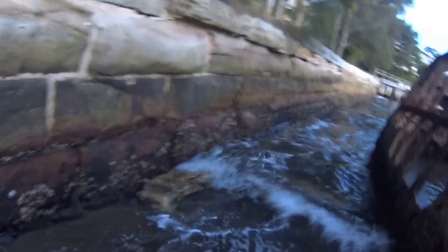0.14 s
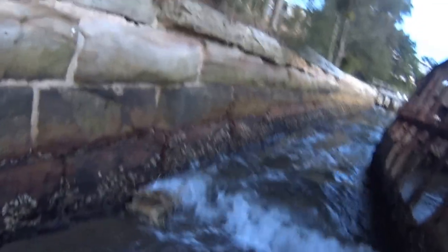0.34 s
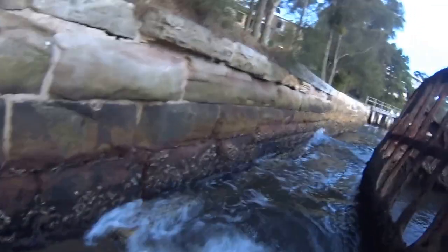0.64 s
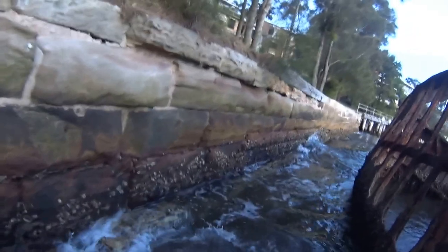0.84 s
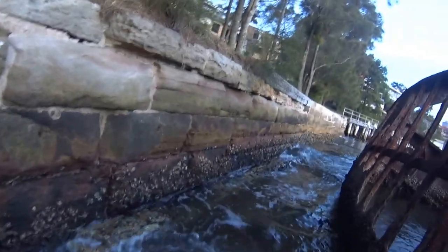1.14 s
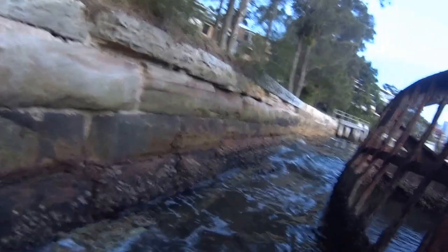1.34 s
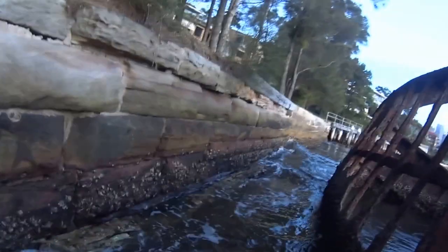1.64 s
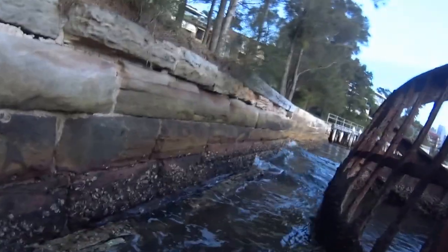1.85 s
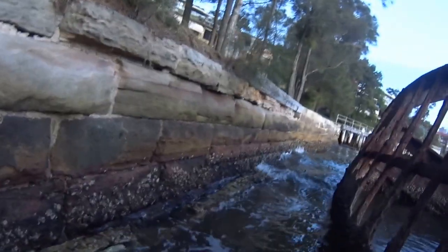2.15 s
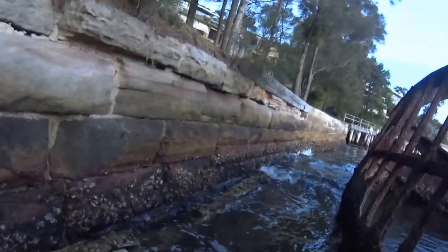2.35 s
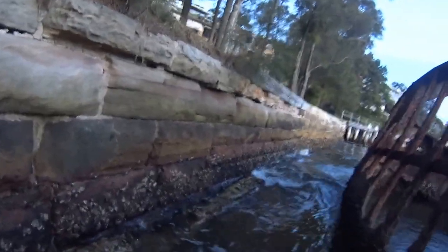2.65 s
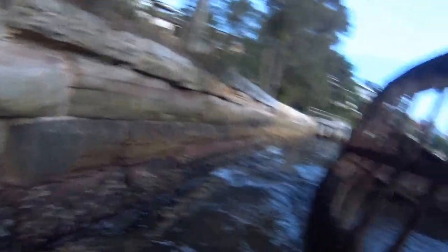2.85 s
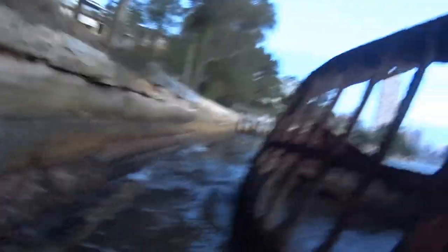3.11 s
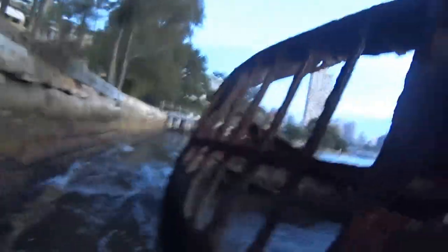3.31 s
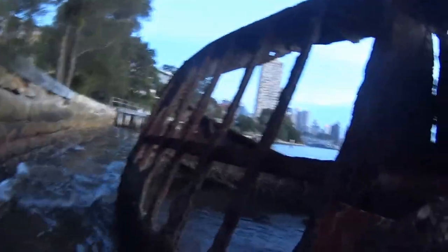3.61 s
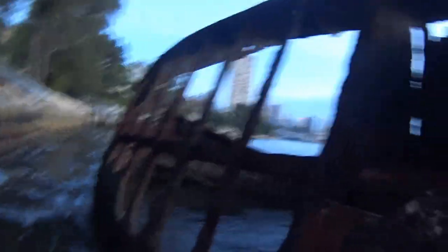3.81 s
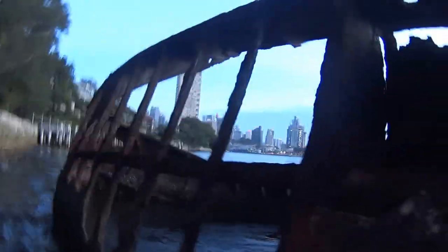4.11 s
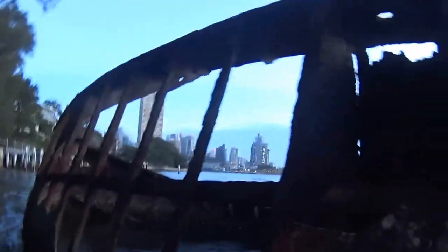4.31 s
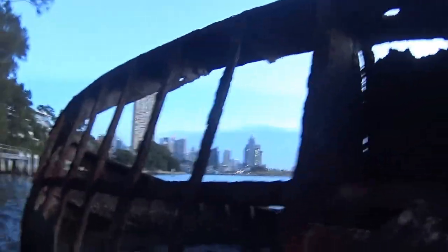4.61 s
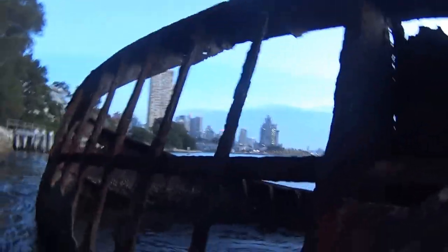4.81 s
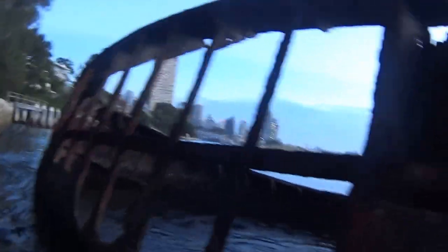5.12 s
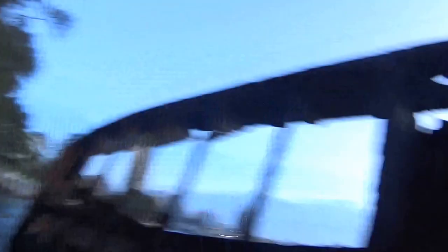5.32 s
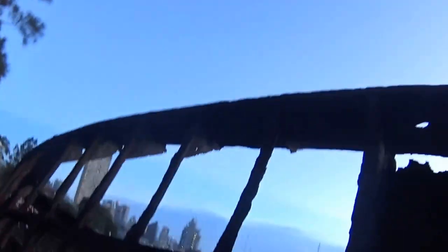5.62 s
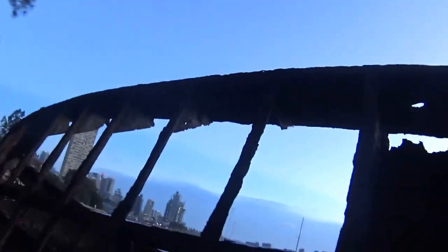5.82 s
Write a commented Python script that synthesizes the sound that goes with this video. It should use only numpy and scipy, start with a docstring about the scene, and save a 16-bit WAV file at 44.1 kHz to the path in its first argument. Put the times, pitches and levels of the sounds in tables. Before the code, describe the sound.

Shallow harbour water sloshes against a stone wall, heard close through a handheld stereo microphone. The first wave foams and drains away to soft lapping, with a couple of sharp taps. Then the grip shifts: a flurry of clicky knocks, creaky rubbing and a short squeak. Low wind buffets and dull finger judders follow while a second wave washes in.

```python
"""A harbour seawall beside a rusted hull, heard close through a handheld camera's stereo microphone.
Small waves wash along the stone: foam fizzes, bubbles and drops ring. One wave breaks at the start,
another near the end, as the microphone turns towards the hull. From about two seconds in the hand shifts
its grip: fingers knock, rub, squeak and judder on the case, which rings near 1.5 kHz, and moving air
rumbles on the two microphone ports."""
import sys
import numpy as np
from scipy import signal
from scipy.fft import rfft, irfft, next_fast_len
from scipy.io import wavfile
from scipy.ndimage import uniform_filter1d

SR = 44100
rng = np.random.default_rng(int(sys.argv[2]) if len(sys.argv) > 2 else 0)


def store_pcm(level_fs):
    """Save levels as 16-bit WAV."""
    pcm = np.round(np.clip(level_fs, -1, 1) * 32767).astype(np.int16)
    wavfile.write(sys.argv[1], SR, np.atleast_2d(pcm).T)


N = 262836
TIME = np.arange(N) / SR

# waves along the wall: crest t/s, level/dB, build t/s
WAVES = [(0.48, -34, 0.7), (2.4, -52.5, 0.66), (4.2, -50.5, 1.37), (5.7, -37.5, 0.58)]
# small splashes: t/s, lift of the wash/dB, half-width t/s
SPLASHES = [(1.007, 2.5, 0.037), (1.796, 5, 0.012), (2.238, 4, 0.031), (2.44, 2.5, .03), (2.635, 2, 0.037),
            (5.111, 9, 0.021)]
# water spectrum, microphone facing the wall or the hull: f/Hz, level/dB
WALL_SPECTRUM = [(100, -20), (200, -13), (400, -10.5), (650, -16.5), (980, -16), (1220, -6.5), (1500, -4),
                 (1800, -8), (2450, -16), (3050, -13), (4000, -11.5), (6100, -7), (7300, -15), (11000, -25)]
HULL_SPECTRUM = [(150, -13), (400, -8), (700, -10.5), (980, -10.5), (1200, 0), (1500, -7), (1900, -5.5),
                 (2250, -15), (3100, -10.5), (4300, -12.5), (6200, -11), (7500, -21), (11000, -32.5)]
# leftward lean of those two views, applied in part to each side: f/Hz, lean/dB
WALL_LEAN = [(600, 0), (1200, 1), (1500, -6.5), (2000, 4), (5000, -2.5), (10000, -1)]
HULL_LEAN = [(300, -2), (700, 3), (1250, 10), (1550, -4.5), (2200, 2.5), (6000, 2.5)]
# stereo width at the ports: f/Hz, side minus mid/dB
PORT_WIDTH = [(100, -13), (350, -14), (650, -2), (950, -8.5), (1300, -6), (2000, -2.5), (2500, 6.5),
              (3600, -3), (6500, -7.5), (11000, -3.5)]
# resonance of the hollow behind the ports: f/Hz, bandwidth/Hz, gain/dB
PORT_HOLLOW = (1510, 45, -0.43)
# close drops and bubbles: t/s, peak/dB, starting f/Hz
DROPS = [(0.272, -27.5, 1560), (0.439, -26, 1474), (0.714, -24.5, 1503), (1.022, -24, 5700),
         (2.328, -32, 1490), (2.499, -32, 5630), (3.438, -28.5, 4370)]
# finger knocks: t/s, ring peak/dB, thud relative to ring/dB, contact t/s
KNOCKS = [(0.0543, -9.5, -24, 0.002), (1.9183, -5.5, -23, 0.001), (2.759, -30.5, -4.5, 0.0021),
          (2.8601, -28, -8, 0.0024), (2.9893, -8.5, -28, 0.0026), (3.0151, -20.5, -7, 0.0056),
          (3.096, -7.5, -14, 0.0044), (3.1085, -9, -8.5, 0.0031), (3.1283, -9, -5, 0.0021),
          (3.207, -17, -5, 0.006), (3.2279, -8, -24, 0.0038), (3.2478, -11.5, -14.5, 0.0068),
          (3.256, -9.5, -29, 0.0024), (3.312, -9.5, -19, 0.0024), (3.3599, -14.5, -4, 0.0056),
          (3.5608, -4.5, -28, 0.003), (3.6377, -18.5, -0.5, 0.0039), (3.7989, -9.5, -16, 0.0049),
          (3.8592, -6.5, -18, 0.0017), (4.0759, -26.5, -4, 0.0037), (4.8127, -19, 6.5, .002),
          (4.905, -17.5, -12, 0.0031), (4.9734, -15, -19, 0.0016), (5.615, -16.5, 6, 0.0027)]
# modes of the case: f/Hz, t60/s, level/dB
CASE_MODES = [(760, 0.015, -3), (1262, 0.022, 5), (1395, 0.015, -0.5), (1560, 0.0088, 18), (1866, 0.022, 1),
              (2320, .01, -34), (3270, 0.019, 8)]
# finger strokes: start t/s, end t/s, level/dB, relative low drag/dB
RUBS = [(3.119, 3.165, -33.5, -11), (3.197, 3.328, -31.5, -16), (3.356, 3.482, -39, -3.5),
        (3.526, 3.581, -37.5, -12), (3.634, 3.797, -29.5, -16), (3.856, 4.045, -29.5, -29),
        (4.291, 4.317, -36.5, -10.5), (4.567, 4.705, -30.5, -18.5), (4.712, 4.785, -27.5, -13),
        (4.816, 4.887, -28, 2.5), (5.239, 5.27, -27.5, 0.5), (5.28, 5.308, -25, 3),
        (5.633, 5.668, -29, 7.5)]
# spectrum of skin sliding on the case: f/Hz, level/dB
SKIN_SPECTRUM = [(240, -59), (400, -46), (528, -13), (726, -5.5), (999, -13.5), (1200, 7), (1970, 3),
                 (2140, -2.5), (2530, -3.5), (2870, -6.5), (4170, -10), (4660, -19), (6060, -14.5),
                 (11000, -44), (14300, -75), (22000, -120)]
# narrow resonances of the rubbed case: f/Hz, bandwidth/Hz, level/dB
CREAK_MODES = [(1924, 63, 0.5), (2910, 38, -3), (3210, 140, -0.5), (3515, 49, 3), (5520, 180, -1.5)]
# finger squeaks: start t/s, end t/s, level/dB, f/Hz
SQUEAKS = [(3.29, 3.327, -20, 1462), (3.318, 3.343, -19, 1435)]
# runs of jumping slips: start t/s, end t/s, level/dB
JUDDERS = [(4.827, 4.875, -17.5), (5.278, 5.318, -17), (5.628, 5.668, -8.5)]
# spectrum of turbulence on the ports: f/Hz, level/dB
AIR_SPECTRUM = [(12, -20), (20, 6), (46, -2), (92, -7.5), (145, -20.5), (269, -20.5), (420, -27.5),
                (500, -28), (650, -64), (1100, -120)]
# gusts over the ports: start t/s, end t/s, level/dB
GUSTS = [(2.71, 4.75, -49), (4.731, 5.155, -29), (5.145, 5.855, -28.3)]
# single buffets, each falling in pitch: t/s, level/dB, nominal f/Hz
BUFFETS = [(1.791, -44, 170), (3.129, -22, 68), (3.614, -32.5, 76.4), (3.637, -37, 108), (4.904, -12.5, 31),
           (5.008, -17, 35.2), (5.284, -8.5, 50), (5.299, -10.5, 225), (5.315, -5.5, 76), (5.491, -5.5, 74),
           (5.625, -18, 45), (5.713, -15.5, 34)]

FLEX_LAG_S, FLEX_PAN_DB = 0.00067, 5.5  # the bending of the case reaches the left port first, and harder


def water():
    """Along the wall, gurgles, fizzing bubbles and foam hiss swell with each wave."""
    surge_db = surge()
    splash_db = sum(db * np.exp(-((TIME - when) / length) ** 2) for when, db, length in SPLASHES)
    foam = rng.standard_normal((2, N)) * undb(1.04 * walk(30))
    gurgle = bubbles(218, 1120, cycles=22, scatter_db=2.5, count=1400)
    fizz = bubbles(1107, 10780, cycles=35, scatter_db=3.5, count=8000)
    wash = ports(undb(1) * foam + undb(-1.5) * gurgle + undb(-4.5) * fizz)
    wash = turn_to_hull(wash + resonance(wash, *PORT_HOLLOW))
    # slack water keeps lapping unevenly after its spray has died
    lapping = colour(wash, [(150, -1), (400, -7), (900, 0.5), (1500, -2.5), (2200, 0.5),
                            (4000, -10.5), (8000, -43)])
    slack = np.clip((-35.5 - surge_db) / 13, 0, 1) * undb(2 * walk(17))
    return (wash * undb(splash_db) + undb(0.5) * slack * lapping) * undb(surge_db - 0.36)


def surge():
    """The swell of the wash in dB: each wave builds, then drains a little faster to slack water."""
    slack_db, drain_ratio = -51.5, 0.79
    power = undb(slack_db) ** 2
    for crest, db, build in WAVES:
        width = build * np.where(TIME < crest, 1, drain_ratio)
        power = power + (undb(db) * np.exp(-((TIME - crest) / width) ** 2)) ** 2
    return 10 * np.log10(power)


def turn_to_hull(wash):
    """The water changes colour as the microphone swings from the wall most of the way to the hull."""
    angle = np.pi / 2 * curve([(4.3, 0.023), (5.2, 0.73)])
    out = 0
    for spectrum, lean, share in ((WALL_SPECTRUM, WALL_LEAN, np.cos(angle)),
                                  (HULL_SPECTRUM, HULL_LEAN, np.sin(angle))):
        left, right = colour(wash, spectrum)
        view = np.array([colour(left, lean, 0.19), colour(right, lean, -0.52)])
        hiss_rms = band(view.mean(0), 4500, 11000, order=4).std()
        out = out + share * view / hiss_rms
    return out


def bubbles(lo_hz, hi_hz, cycles, scatter_db, count):
    """A cloud of bubbles, most of them faint, scattered over mid and side."""
    out = np.zeros((2, N))
    for when, size, length, loud, place in rng.random((count, 5)):
        hz = lo_hz * (hi_hz / lo_hz) ** size
        gain = undb(-scatter_db * np.log(max(loud, .01))) * hz
        angle = 2 * np.pi * place
        ring = bubble(hz, cycles * (.5 + length) / hz)
        add(out, when * (N - 1) / SR, gain * np.outer([np.cos(angle), np.sin(angle)], ring))
    return unit(out) * np.sqrt(2 * (hi_hz - lo_hz) / SR)  # as strong per Hz as white noise of rms 1


def bubble(hz, t60, glide=0.11):
    """A ringing air pocket whose pitch rises as it nears the surface."""
    age = np.arange(int(t60 * SR)) / (t60 * SR)
    phase = 2 * np.pi * hz * t60 * age * (1 + glide * age / 2)
    return np.sin(phase) * np.exp(-np.log(1000) * age) * (1 - np.exp(-age / 0.021))


def drops(cycles=51):
    """Single drops and bubbles close to the microphone; the small, high ones die sooner."""
    out = np.zeros(N)
    for start, db, hz in DROPS:
        add(out, start, undb(db) * peak(bubble(hz, t60=cycles / hz)))
    return out


def knocks():
    """Right at the microphone, a finger's touch and chatter ring the case, with a crack and a thud."""
    out, t = np.zeros((2, N)), np.arange(SR // 16) / SR
    thud_pan = undb([[1.25], [-1.25]])
    for start, db, thud_db, contact in KNOCKS:
        touch = np.exp(-(t / contact) ** 2) + 0.048 * np.exp(-t / 0.051)
        chatter = spread(rng.standard_normal((2, len(t))) * touch, side_db=-3)
        push = chatter + 14 * (t == 0)
        ring = peak(band(case_ring(push), 1110, 3200))
        # the hollow behind the ports flattens the first, strongest swings
        ring = peak(band(np.tanh(1.4 * ring), 550, 1900))
        crack = peak(band(band(chatter, 1320, 6200), 1700, 3330, order=1))
        crack_db = -8 + 9 * np.log2(contact / 0.0029)  # a longer graze is brighter
        # the flexing case rings hollow, in opposite phase at the two ports
        flex = undb(4) * np.outer([1, -.5], band(push[0], 570, 597, order=1))
        thud = peak(band(push, 124, 730) + flex) * thud_pan
        add(out, start, undb(db) * (ring + undb(crack_db) * crack + undb(thud_db) * thud))
    return out


def case_ring(push):
    """A push rings the modes of the camera case, tuned a little differently with each grip."""
    t = np.arange(push.shape[-1]) / SR
    modes = 0
    for hz, t60, db in CASE_MODES:
        pitch = hz * (1 + 0.022 * rng.standard_normal())
        modes = modes + undb(db) * np.sin(2 * np.pi * pitch * t) * np.exp(-np.log(1000) * t / t60)
    return signal.fftconvolve(push, modes[None], axes=-1)[:, :len(t)]


def rubs(ease_db_per_s=13):
    """Skin slips in dense, uneven steps that creak in the case; a firm finger also drags it."""
    slide, drag = np.zeros((2, N))
    for start, end, db, drag_db in RUBS:
        pressure = undb(db - ease_db_per_s * np.maximum(TIME - start, 0))
        stroke = hold(start, end, attack_s=0.0071, release_s=0.024) * pressure
        slide += stroke
        drag += stroke * undb(drag_db)
    slips = rng.standard_normal((2, N)) * (rng.random(N) < .12)
    slips = ports(slips * undb(1.2 * walk(220) + 1.9 * walk(45)))
    scrape = colour(slips, SKIN_SPECTRUM)
    creak = sum(resonance(scrape, *mode) for mode in CREAK_MODES)
    # the creaking pitches wander with the pressure of the finger
    warped_time = TIME + np.cumsum(0.035 * walk(22)) / SR
    creak = np.array([np.interp(warped_time, TIME, side, period=N / SR) for side in creak])
    scrape = slide * unit(scrape + undb(5.5) * creak)
    flex = drag * unit(band(slips[0], 81, 890))
    return undb(4) * scrape + left_first(flex, FLEX_LAG_S, FLEX_PAN_DB)


def squeaks():
    """For a moment the slipping finger locks to the ring of the case, louder at the right port."""
    out, waver = np.zeros(N), walk(350)
    for start, end, db, hz in SQUEAKS:
        pitch = hz * (1 + 0.025 * waver[int(start * SR):int(end * SR)])
        phase = 2 * np.pi * np.cumsum(pitch) / SR
        add(out, start, undb(db) * signal.windows.tukey(len(phase), .7) * np.sin(phase))
    return np.outer([undb(-3.5), undb(2)], out)


def judder(slips_per_s=150, growth_db=7.5):
    """A finger jumps along the case in separate dull slips that grow as the grip tightens."""
    body, ring = np.zeros(N), np.zeros((2, N))
    for start, end, db in JUDDERS:
        slips = np.zeros((2, SR // 8))
        for when in np.arange(0, end - start, 1 / slips_per_s):
            late, size, side = rng.standard_normal(3)
            strength = undb(2.5 * size + growth_db * when / (end - start))
            add(slips, when + 0.001 * abs(late), strength * np.array([[1], [0.4 + 0.34 * side]]))
        add(body, start, undb(db) * peak(band(slips[0], 137, 1500, order=4)))
        add(ring, start, undb(db - 7.5) * peak(band(case_ring(slips), 820, 2020, order=4)))
    return left_first(body, FLEX_LAG_S, FLEX_PAN_DB) + ring


def air(calm_db=-54.5):
    """Low turbulence on the ports, and buffets that swing the microphone membranes a few times."""
    rumble = unit(colour(rng.standard_normal(N), AIR_SPECTRUM))
    gusts = [undb(db) * hold(start, end, attack_s=0.073, release_s=0.12) for start, end, db in GUSTS]
    rumble *= np.maximum(np.max(gusts, axis=0), undb(calm_db))
    thumps, t = np.zeros(N), np.arange(SR // 4) / SR
    for start, db, hz in BUFFETS:
        rise_s = 0.0056 * (71.6 / hz) ** 0.55  # deeper buffets build more slowly
        pitch = hz * (.5 + 0.63 * np.exp(-t / 0.025))
        phase = 2 * np.pi * np.cumsum(pitch) / SR
        add(thumps, start, undb(db) * peak(np.sin(phase) * t * np.exp(-t / rise_s)))
    return left_first(rumble + thumps, lag_s=0.00082, pan_db=1.5)  # eddies meet the left port first


def ports(pair):
    """The two ports hear the bass alike and the middle range differently."""
    return spread([pair[0], colour(pair[1], PORT_WIDTH)], side_db=0)


def spread(pair, side_db):
    """Two unrelated sounds, taken as mid and side, become left and right."""
    side = pair[1] * undb(side_db)
    return np.array([pair[0] + side, pair[0] - side])


def left_first(x, lag_s, pan_db):
    """A sound reaches the right port later and weaker."""
    return np.array([undb(pan_db / 2) * x, undb(-pan_db / 2) * np.interp(TIME - lag_s, TIME, x)])


def resonance(x, hz, width_hz, db):
    """One narrow mode sings along with a sound."""
    return undb(db) * band(x, hz - width_hz / 2, hz + width_hz / 2, order=1)


def colour(x, points, power=1):
    """Filter by a spectrum of f/Hz, level/dB points; power scales the dB."""
    size = next_fast_len(N)
    hz, db = np.transpose(points)
    bins = np.maximum(np.arange(size // 2 + 1) * SR / size, 1)
    gain = undb(power * np.interp(np.log(bins), np.log(hz), db))
    return irfft(rfft(x, size) * gain, size)[..., :N]


def band(x, lo_hz, hi_hz, order=2):
    """Causal band-pass."""
    return signal.sosfilt(signal.butter(order, [lo_hz, hi_hz], "band", fs=SR, output="sos"), x)


def walk(rate):
    """Random levels held 1 / rate s and smoothed twice, at rms 1."""
    step = int(SR / rate)
    levels = np.repeat(rng.standard_normal(N // step + 1), step)
    return unit(uniform_filter1d(uniform_filter1d(levels, step), step)[:N])


def hold(start, end, attack_s, release_s):
    """An envelope that rises, holds and falls."""
    return np.clip((TIME - start) / attack_s, 0, 1) * np.clip(1 - (TIME - end) / release_s, 0, 1)


def curve(rows):
    """Join rows of t/s, value by straight lines."""
    return np.interp(TIME, *np.transpose(rows))


def add(out, start, sound):
    """Mix a sound in at a time."""
    i = int(start * SR)
    out[..., i:i + sound.shape[-1]] += sound[..., :N - i]


def undb(db):
    """Decibels to gain."""
    return 10 ** (np.asarray(db) / 20)


def unit(x):
    """Scale to rms 1."""
    return x / np.sqrt(np.mean(x ** 2))


def peak(x):
    """Scale to peak 1."""
    return x / np.abs(x).max()


def scene():
    """Water all around, the hand and the air right at the microphone."""
    return water() + drops() + knocks() + rubs() + squeaks() + judder() + air()


def record(dry):
    """The camera cuts the bass below 14 Hz and the top above 11.2 kHz."""
    dry = signal.sosfilt(signal.butter(2, 14, "high", fs=SR, output="sos"), dry)
    return signal.sosfilt(signal.ellip(10, .2, 70, 11200, fs=SR, output="sos"), dry)


dry = scene()
out = record(dry)
store_pcm(out)
```